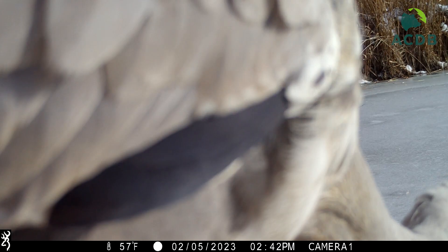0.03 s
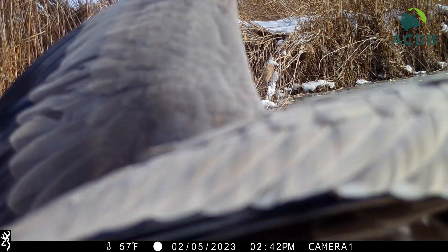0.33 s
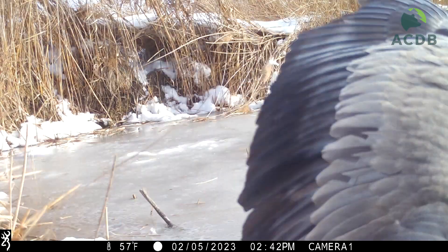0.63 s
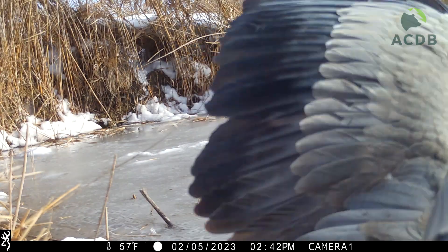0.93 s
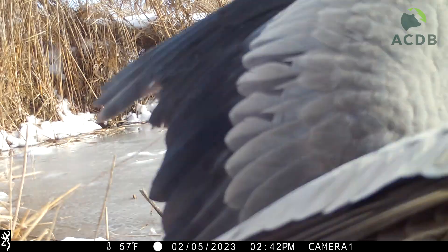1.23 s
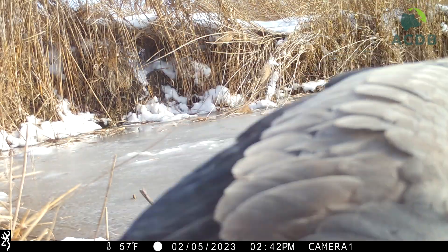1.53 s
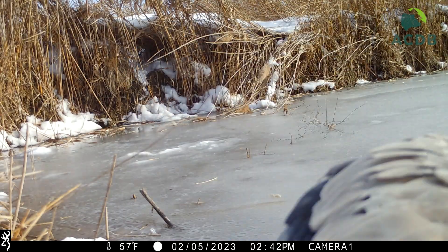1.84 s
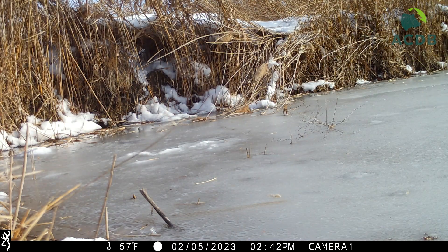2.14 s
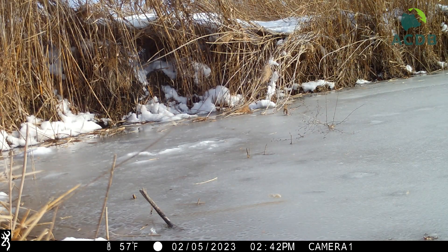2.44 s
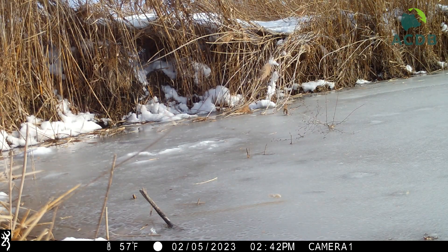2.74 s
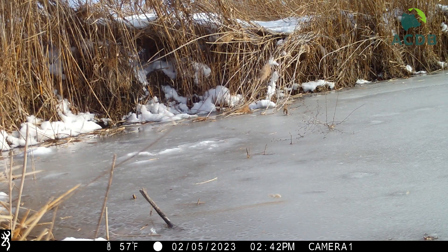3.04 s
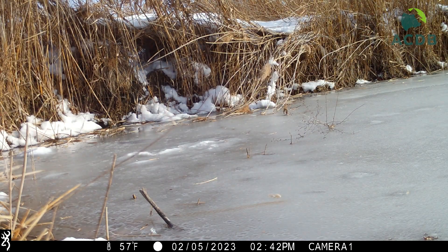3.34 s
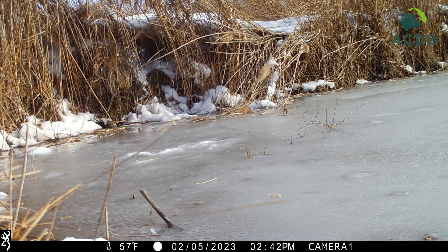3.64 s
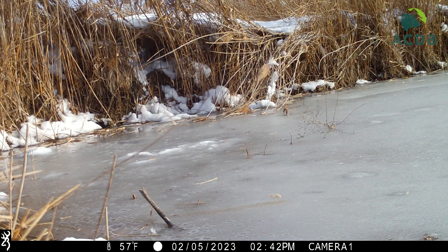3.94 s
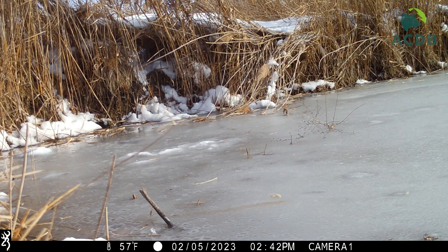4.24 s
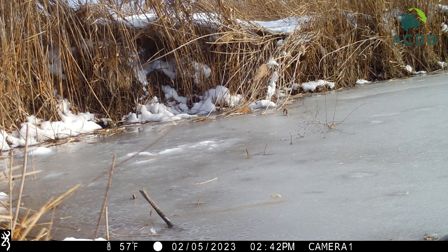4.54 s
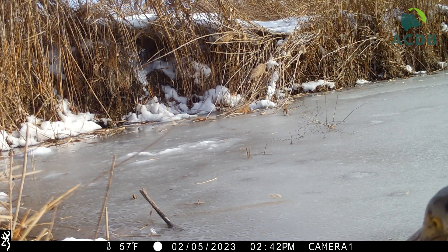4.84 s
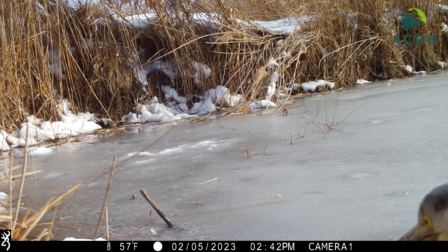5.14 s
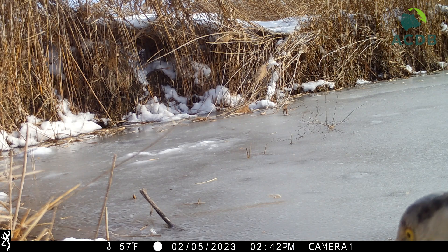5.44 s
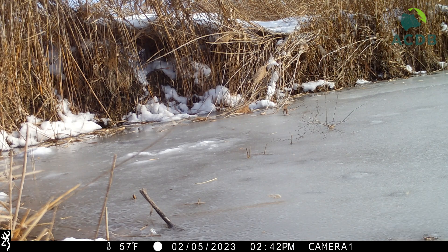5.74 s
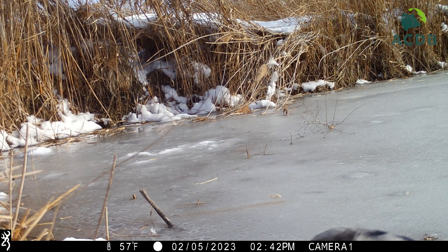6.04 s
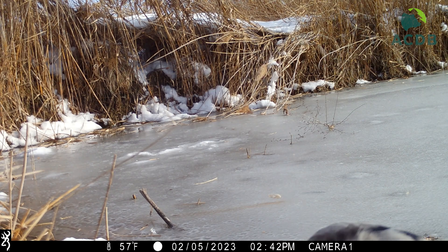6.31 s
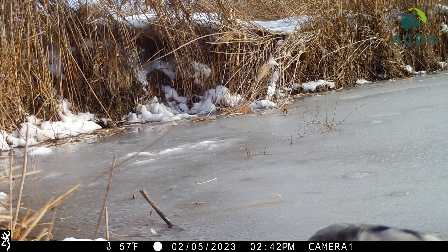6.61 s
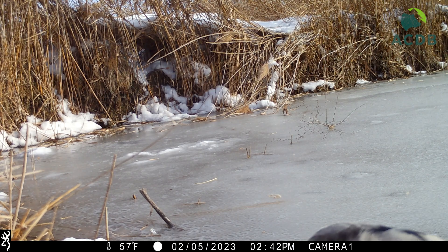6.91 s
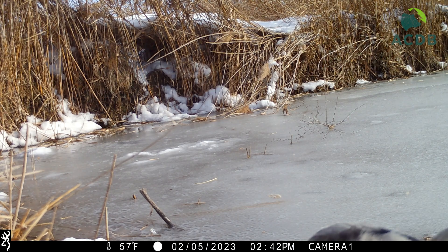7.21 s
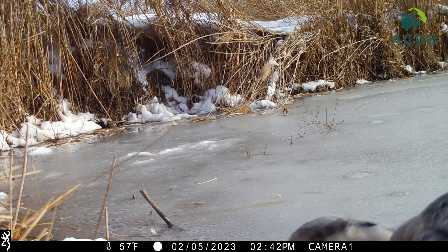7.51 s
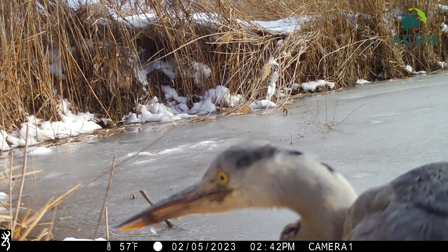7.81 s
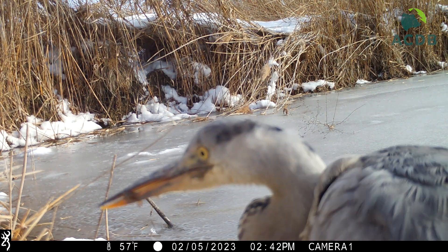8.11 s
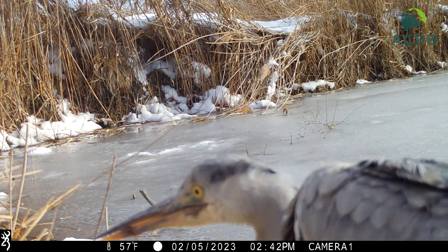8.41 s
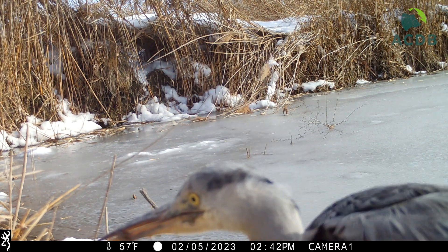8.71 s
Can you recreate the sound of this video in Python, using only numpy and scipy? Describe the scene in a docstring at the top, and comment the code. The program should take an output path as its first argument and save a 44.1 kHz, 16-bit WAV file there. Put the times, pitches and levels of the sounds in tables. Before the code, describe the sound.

A heron's wings rustle close by and slap the microphone, then soft feather shuffling, light wind and three faint bird cries follow.

```python
"""A heron at a trail camera

Beside a frozen channel, a heron beats and folds its wings: feathers rub and rustle, quills tick.
One wing slaps the camera's housing, overloads the microphone and flutters across its opening.
Then the bird shuffles quietly and light wind rumbles on the microphone. Far off, reeds and trees
make a soft hush, and another bird gives three falling cries."""
import sys
import numpy as np
from scipy import signal
from scipy.fft import rfft, irfft
from scipy.io import wavfile

SR = 44100
rng = np.random.default_rng(int(sys.argv[2]) if len(sys.argv) > 2 else 0)


def wav_out(sig):
    """Save sig, one row per channel (or a flat mono array), as 16-bit PCM at SR to the path in sys.argv[1]."""
    wavfile.write(sys.argv[1], SR, np.round(np.clip(np.atleast_2d(sig).T, -1, 1) * 32767).astype(np.int16))


N = 395136
TIME = np.arange(N) / SR

# The tone of far wind in reeds and trees: pitch_hz, gain_db
HUSH_SPECTRUM = [(25, -11), (60, -9), (120, -8.5), (220, -4), (450, -1), (800, 0), (1250, -0.5),
                 (2000, -4.5), (3200, -11.5), (5000, -20.5), (8000, -25)]
# The distant bird's cries: start_s, pitch_hz, level_db
FAR_CRIES = [(3.93, 1315, -66), (4.90, 1322, -61), (5.945, 1378, -62.5)]
# How one cry falls and fades: since_start_s, pitch_ratio, gain_db
CRY_SHAPE = [(0, 1, -10), (.03, .98, -2.5), (.07, .915, 2.5), (.12, .86, -1), (.2, .79, -6),
             (.26, .77, -23)]
# The tone of wind on the microphone: pitch_hz, gain_db
RUMBLE_SPECTRUM = [(15, -10.5), (35, -5), (85, 2), (150, -1.5), (230, -8.5), (400, -21.5), (1000, -51)]
# Gusts at the microphone, the first stirred by the wing: peak_s, level_db, half_length_s
WIND_GUSTS = [(.72, -51.5, .09), (1.18, -63, .22), (2.9, -72, .2), (3.6, -62, .3), (4.06, -57.5, 0.34),
              (4.48, -57, 0.13), (4.8, -60, 0.14), (5.06, -58, 0.087), (5.28, -62, 0.19),
              (5.88, -68.5, 0.13), (6.6, -61.5, 0.15), (6.96, -61.5, 0.14), (7.32, -63.5, 0.14),
              (7.98, -59, 0.23), (8.46, -56.5, 0.31), (8.88, -52.5, 0.28)]
# The tone of rubbing feathers: pitch_hz, gain_db
FEATHER_SPECTRUM = [(60, -29.5), (200, -22), (400, -12), (800, -7), (1700, -3.5), (2600, -1.5), (3500, -4),
                    (4800, -1), (15000, 0.5)]
# The heron shuffling its feathers: peak_s, level_db, half_length_s
BODY_SHUFFLES = [(1.91, -60.5, 0.23), (2.29, -61, .06), (2.375, -57.5, 0.064), (2.615, -57.5, 0.048),
                 (2.835, -58.5, 0.082), (2.97, -66.5, .06), (3.16, -71, 0.037), (3.33, -63.5, 0.033),
                 (3.55, -65, 0.22), (3.66, -61, 0.036), (3.87, -62.5, .04), (4.25, -71, 0.22),
                 (4.6, -67, 0.078), (4.87, -65, .02), (4.97, -67.5, 0.055), (5.59, -66.5, 0.038),
                 (5.81, -68, .03), (5.98, -75, .12), (6.785, -56, 0.047), (6.89, -62.5, .04),
                 (6.97, -58, 0.047), (7.11, -64, 0.025), (7.28, -68, .04), (7.65, -71.5, 0.26),
                 (8.08, -65, 0.27), (8.2, -56, .025), (8.28, -58, 0.078), (8.38, -58.5, .05),
                 (8.49, -59.5, 0.027), (8.565, -61.5, 0.062)]
# The wings beating, then folding: peak_s, level_db, half_length_s
WING_SWEEPS = [(.065, -39.5, 0.041), (.13, -36.5, 0.047), (.172, -33.5, .018), (.22, -38.5, 0.052),
               (.295, -37.5, 0.038), (.375, -40.5, 0.073), (.44, -38, 0.02), (.565, -42.5, 0.075),
               (.675, -43.5, 0.1), (.803, -37.5, 0.033), (.885, -37, .03), (.95, -41.5, 0.054),
               (1.018, -44, 0.035), (1.165, -55.5, .03), (1.228, -50, 0.031), (1.32, -60, .07),
               (1.415, -52.5, 0.018), (1.56, -59, 0.033), (1.62, -51, 0.046), (1.675, -52.5, 0.025)]
# Quills and dry stems ticking: start_s, level_db, pitch_hz
QUILL_TICKS = [(0.1097, -17, 3510), (0.1215, -12, 2440), (0.1384, -22, 2860), (0.1646, -16, 1930),
               (0.297, -19, 4670), (0.3551, -19.5, 2600), (0.4096, -24.5, 2990), (0.436, -26, 4200),
               (0.499, -32, 2110), (0.569, -24.5, 1410), (0.6484, -28, 4240), (0.668, -22, 4710),
               (0.866, -23, 3890), (0.8789, -18, 4560), (1.2156, -31, 4750), (1.5454, -36, 3080),
               (2.378, -34, 2160), (2.7312, -44.5, 2880), (2.9218, -39.5, 1920), (4.2657, -42, 2390),
               (4.86, -38, 2720), (5.1825, -34, 1590), (5.398, -39.5, 4180), (5.683, -37.5, 4200),
               (6.98, -38, 3040), (6.9965, -37.5, 1740), (7.875, -38, 4600)]
# Quick strokes of feather over feather: peak_s, level_db, pitch_hz, sharpness_q, fall_s
FEATHER_STROKES = [(0.715, -23, 5640, 2.9, .003), (1.219, -40.5, 4020, 1.2, 0.013),
                   (1.412, -46, 2500, 0.83, .005), (1.547, -44.5, 3020, 1.5, 0.0055),
                   (1.722, -39, 4160, 21, 0.0022), (2.041, -32.5, 6400, 3.2, 0.0073),
                   (2.121, -47, 6040, 3, .004), (3.543, -44.5, 1570, 6, .004),
                   (3.84, -44, 2900, 5.8, 0.0038), (5.40, -52, 4400, 1.8, 0.011),
                   (6.15, -57.5, 3600, 1.3, 0.012), (6.788, -41.5, 1470, 1.7, 0.0064),
                   (6.948, -38, 2080, 0.52, 0.0052), (8.18, -45, 3000, 0.77, 0.023),
                   (8.479, -41.5, 3500, 0.49, 0.0085)]
# Air shoved at the microphone: peak_s, level_db, corner_hz, rise_s, fall_s
AIR_PUFFS = [(0.608, 1, 1020, 0.0018, 0.0039), (0.633, -20, 400, 0.012, 0.01),
             (0.653, -30.5, 380, 0.0045, 0.007), (0.752, -42, 260, 0.0032, 0.0022),
             (0.843, -36, 230, 0.0049, 0.0032), (5.894, -49, 150, 0.0023, .004)]
# How the sealed housing muffles high sounds: pitch_hz, gain_db
HOUSING_RESPONSE = [(20, 2.5), (4700, -1.5), (5200, -7), (5800, -17.5), (6500, -26), (8600, -33),
                    (10600, -29), (15500, -40)]


def undb(db):
    """Turn decibels into a number to multiply by."""
    return 10 ** (np.asarray(db) / 20)


def unit(x):
    """Scale a sound so its average strength (rms) is 1."""
    return x / np.sqrt(np.mean(x ** 2) + 1e-30)


def noise(size=N):
    """White noise: an even hiss."""
    return rng.standard_normal(size)


def wander(rate_hz):
    """Random values joined by straight lines, straying about 1 either side of zero."""
    return 1.2 * np.interp(TIME * rate_hz, np.arange(4096), noise(4096))


def colour(x, spectrum, size=4096):
    """Make each pitch louder or softer, following a table of pitch_hz, gain_db."""
    hz, db = np.transpose(spectrum)
    grid_hz = np.arange(size // 2 + 1) * SR / size + 1
    gain = undb(np.interp(np.log(grid_hz), np.log(hz), db))
    # Build the filter so that it never rings before a sound arrives.
    cepstrum = irfft(np.log(gain))
    cepstrum[1:size // 2] *= 2
    cepstrum[size // 2 + 1:] = 0
    click_response = irfft(np.exp(rfft(cepstrum)))
    return signal.oaconvolve(x, click_response)[:len(x)]


def keep_band(x, hz, kind, order=2):
    """Let the "low" part, the "high" part or a middle "band" through."""
    return signal.sosfilt(signal.butter(order, hz, kind, fs=SR, output="sos"), x)


def ring(x, hz, q):
    """Make a sound ring at one pitch; a higher q rings longer."""
    return signal.lfilter(*signal.iirpeak(hz, max(q, hz / 15000), fs=SR), x)


def add(out, start_s, x):
    """Mix x into out, beginning at start_s."""
    i = max(int(start_s * SR), 0)
    out[i:i + len(x)] += x[:N - i]


def clicks(per_s, spread_db, size=N):
    """Random clicks, mostly small and a few large."""
    strengths = undb(spread_db * np.clip(noise(size), -2, 2)) * np.sign(noise(size))
    return unit(strengths * (rng.random(size) < per_s / SR))


def add_burst(out, peak_s, db, rise_s, fall_s, texture):
    """Mix in a sound that swells to a peak and dies away."""
    t = (np.arange(len(texture)) - len(texture) // 2) / SR
    shape = np.exp(np.where(t < 0, t / rise_s, -t / fall_s))
    burst = undb(db) * unit(texture * shape) * np.sqrt(np.mean(shape ** 2))
    add(out, peak_s + t[0], burst)


def swells_db(table, roundness, rest_db):
    """The level of overlapping movements; roundness 1 gives pointed peaks, 2 gives bell shapes."""
    power = sum(undb(db) ** 2 * np.exp(-2 * np.abs((TIME - peak_s) / half_s) ** roundness)
                for peak_s, db, half_s in table)
    return 10 * np.log10(power + undb(rest_db) ** 2)


def far_hush(level_db=-57.5, drift_db=0.34):
    """Far wind brushes through reeds and trees."""
    return unit(colour(noise(), HUSH_SPECTRUM)) * undb(level_db + drift_db * wander(2.4))


def far_bird(second_db=-4.5, third_db=-10, waver=0.008, echo_db=-9, echo_s=.08):
    """Thin falling cries with two overtones, smeared a little by echoes from the banks."""
    times, ratios, gains_db = np.transpose(CRY_SHAPE)
    out, t = np.zeros(N), np.arange(int(times[-1] * SR)) / SR
    glide = np.interp(t, times, ratios)
    shape_db = np.interp(t, times, gains_db)
    for start_s, hz, db in FAR_CRIES:
        pitch_hz = hz * glide * (1 + waver * wander(140)[:len(t)])
        phase = 2 * np.pi * np.cumsum(pitch_hz) / SR
        tone = np.sin(phase) + undb(second_db) * np.sin(2 * phase) + undb(third_db) * np.sin(3 * phase)
        add(out, start_s, unit(tone) * undb(db + shape_db))
    banks = noise(SR // 2) * np.exp(-TIME[:SR // 2] / echo_s)
    echo = signal.oaconvolve(out, banks / np.linalg.norm(banks))[:N]
    return out + undb(echo_db) * echo


def near_wind(gain_db=0.55, buffet_db=3.0):
    """Light gusts tumble over the microphone's opening in small swirls."""
    gust_db = swells_db(WIND_GUSTS, roundness=1.9, rest_db=-78.5) + gain_db
    rumble = unit(colour(noise(), RUMBLE_SPECTRUM))
    return rumble * undb(gust_db + buffet_db * np.clip(wander(60), -2, 2))


def rustle(level_db, lows_db, slips_per_s, spread_db, jerk_db):
    """Barbs, a feather's tiny branches, slip in jerks; each feather crackles at its own pitch."""
    feathers = sum(unit(ring(clicks(slips_per_s / 4, spread_db), hz, q=1.1)) * np.sqrt(hz)
                   for hz in np.geomspace(1000, 5000, num=5))
    slips = clicks(slips_per_s, spread_db) + .45 * unit(feathers) + .35 * noise()
    slips = colour(slips, FEATHER_SPECTRUM)
    highs = keep_band(slips, 2200, "high", order=4)
    lows = keep_band(slips, 2200, "low", order=4)
    mid_strength = np.std(keep_band(highs, 5200, "low", order=4))
    return (highs + undb(lows_db) * lows) / mid_strength * undb(level_db + jerk_db * wander(110))


def plumage(folded_s=1.74, crackle_db=-3, crackle_hz=4600, wing_gain_db=-0.52, shuffle_gain_db=0.5):
    """Feathers rustle as the wings beat, then as the bird settles; barbs unhook with a fine crackle."""
    wing_db = swells_db(WING_SWEEPS, roundness=1.2, rest_db=-63) + wing_gain_db
    shuffle_db = swells_db(BODY_SHUFFLES, roundness=0.93, rest_db=-76.5) + shuffle_gain_db
    lows_db = -2 + 0.2748 * (-35 - wing_db)  # slower, quieter sweeps sound duller
    wings = rustle(wing_db, lows_db, slips_per_s=2400, spread_db=4.0, jerk_db=1.46)
    shuffle = rustle(shuffle_db, lows_db=4, slips_per_s=1100, spread_db=2.5, jerk_db=3.0)
    unhooking = clicks(per_s=170.5, spread_db=7.3)
    crackle = unit(ring(ring(unhooking, crackle_hz, q=1.8), crackle_hz, q=1.8))
    beating = TIME < folded_s
    crackle *= undb(crackle_db + np.where(beating, wing_db, shuffle_db))
    return np.where(beating, wings, shuffle) + crackle


def quill_ticks(snap_mix=0.49, grit_mix=0.52, grit_fade_s=0.0014, gain_db=1):
    """A stiff quill or stem lets go: a dry snap, a trace of grit and a very short ring."""
    out, t = np.zeros(N), np.arange(SR // 25) / SR
    for start_s, db, hz in QUILL_TICKS:
        slip = grit_mix * noise(len(t)) * np.exp(-t / grit_fade_s)
        slip[0] += 2  # the jolt of letting go
        shaft = unit(ring(slip, hz, q=2.8))
        snap = unit(keep_band(ring(slip, 2800, q=0.48), 5500, "low"))
        tick = keep_band(shaft + snap_mix * snap, 700, "high")
        add(out, start_s, undb(db + gain_db) * tick / np.abs(tick).max())
    return out


def scrape(hz, q):
    """A dragged feather makes a dense run of tiny slips."""
    return ring(clicks(per_s=7000, spread_db=5.6, size=SR // 2), hz, q)


def feather_strokes():
    """One feather slides quickly over another, at times with a tiny squeak."""
    out = np.zeros(N)
    for peak_s, db, hz, q, fall_s in FEATHER_STROKES:
        add_burst(out, peak_s, db, rise_s=.0013, fall_s=fall_s, texture=scrape(hz, q))
    return out


def wing_slap():
    """Feathers hit the housing and scrape across it."""
    out = np.zeros(N)
    add_burst(out, peak_s=.608, db=-10.5, rise_s=.0034, fall_s=.0055, texture=scrape(hz=2820, q=1.1))
    return out


def wing_flutter(start_s=0.626, length_s=0.021, flicks_per_s=260, level_db=-21.5, jitter_s=0.00058):
    """The wing's feather tips flick over the microphone's opening one by one."""
    out, flicks = np.zeros(N), np.zeros(SR // 10)
    for flick_s in np.arange(0, length_s, 1 / flicks_per_s):
        add(flicks, flick_s + jitter_s * rng.standard_normal(), undb(2.9 * noise(1)))
    flicks = keep_band(flicks, 1050, "low", order=4)
    flicks = keep_band(flicks, 250, "high")
    add(out, start_s, undb(level_db) * flicks * np.sqrt(length_s * SR / np.sum(flicks ** 2)))
    return out


def wing_puffs(growth=1.9):
    """The wing shoves air into the microphone's opening, making swirls of every size."""
    out, pitches_hz = np.zeros(N), np.geomspace(85, 1800, num=8)
    for peak_s, db, corner_hz, rise_s, fall_s in AIR_PUFFS:
        # Power grows with pitch up to corner_hz and drops steeply above it.
        power = (pitches_hz / corner_hz) ** growth / (1 + (pitches_hz / corner_hz) ** 8)
        for hz, share in zip(pitches_hz, power / power.sum()):
            swirls = keep_band(noise(SR // 2), [hz * .8, hz / .8], "band")
            add_burst(out, peak_s, db + 10 * np.log10(share), rise_s, fall_s, swirls)
    return out


def scene():
    """Everything that reaches the camera, in one channel."""
    heron = plumage() + quill_ticks() + wing_slap() + feather_strokes() + wing_puffs() + wing_flutter()
    return (heron + near_wind() + far_hush() + far_bird())[None]


def record(dry, hiss_db=-88.5, whine_db=-92, ceiling=.72, wake_s=.057, top_hz=15700):
    """The housing muffles the highs; the electronics hiss, whine, overload and wake a moment late."""
    hiss = undb(hiss_db) * unit(keep_band(noise(), 11000, "low"))
    whine_hz = 7800 + 35 * wander(200)
    whine = undb(whine_db) * unit(np.sin(2 * np.pi * np.cumsum(whine_hz) / SR))
    sound = colour(dry[0], HOUSING_RESPONSE) + hiss + whine
    sound = sound / (1 + (np.abs(sound) / ceiling) ** 8) ** (1 / 8)  # squash the loudest peaks
    treble_cut = signal.ellip(8, .2, 70, top_hz, fs=SR, output="sos")
    return signal.sosfilt(treble_cut, sound * (TIME > wake_s))[None]


dry = scene()
out = record(dry)
wav_out(out)
```